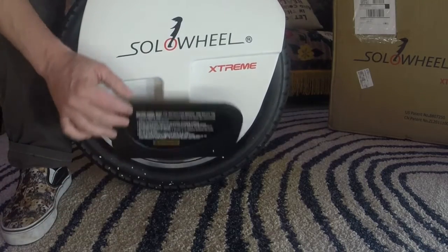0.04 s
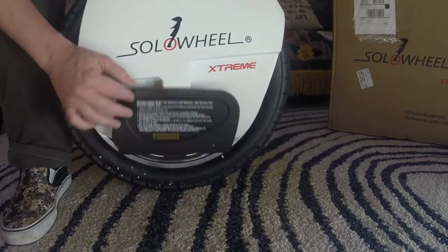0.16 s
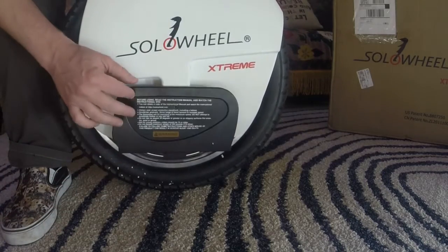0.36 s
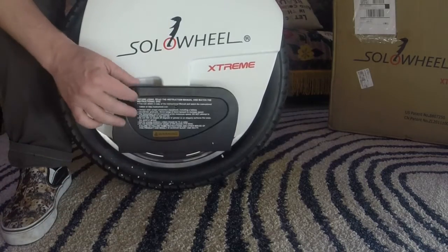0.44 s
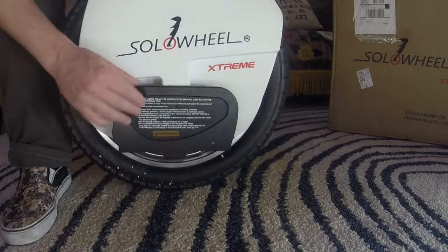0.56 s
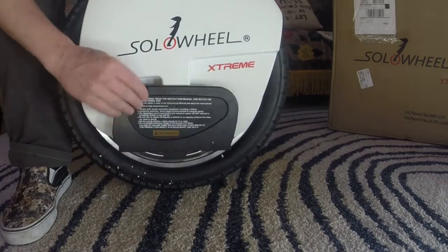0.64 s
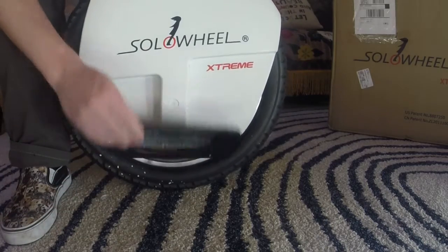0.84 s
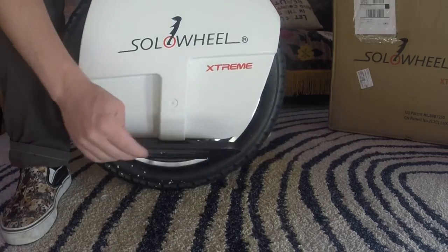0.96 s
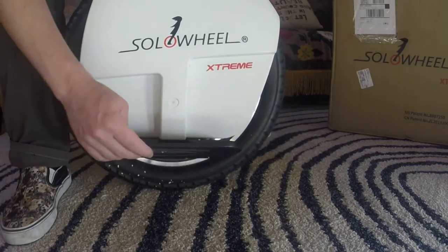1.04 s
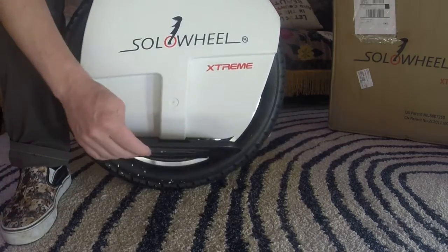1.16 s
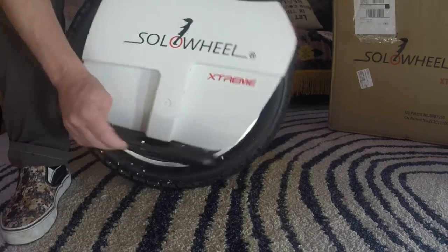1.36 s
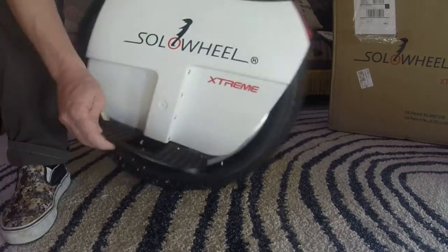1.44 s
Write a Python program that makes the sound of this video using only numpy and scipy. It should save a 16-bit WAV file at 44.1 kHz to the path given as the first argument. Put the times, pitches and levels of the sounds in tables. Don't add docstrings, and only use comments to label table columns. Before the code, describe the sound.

Close-up, a hinged pedal on a one-wheeled scooter gives one loud bright clack, then faint finger taps and a softer double clatter with low thud, in a carpeted room with slight flutter echo and low room tone.

```python
import sys
import numpy as np
from scipy import signal
from scipy.io import wavfile

SR = 44100
rng = np.random.default_rng(int(sys.argv[2]) if len(sys.argv) > 2 else 0)


def file_out(sig):
    cols = np.atleast_2d(sig).T
    lim = np.clip(cols, -1, 1)
    pcm = np.round(lim * 32767).astype(np.int16)
    wavfile.write(sys.argv[1], SR, pcm)


def boost_factor(decibels):
    exponent = np.asarray(decibels, float) / 20
    return 10 ** exponent


N = 66150


def rms_one(x):
    return x / np.sqrt(np.mean(x ** 2) + 1e-20)


def in_time(rows):
    return np.interp(np.arange(N) / SR, *np.transpose(rows))


def at_hz(points, hz):
    table_hz, value = np.transpose(points)
    return np.interp(np.log(hz), np.log(table_hz), value)


def filtered(x, order, hz, kind):
    return signal.sosfilt(signal.butter(order, hz, kind, fs=SR, output="sos"), x)


def drift(rate_hz):
    hop = 40
    pole = np.exp(-2 * np.pi * rate_hz * hop / SR)
    noise = rng.standard_normal(N // hop + 2002)
    slow = signal.lfilter([1], [1, -2 * pole, pole ** 2], noise)[2000:]
    return np.interp(np.arange(N) / hop, np.arange(len(slow)), rms_one(slow))


def noise_bands():
    edges = 20 * 2 ** (np.arange(30) / 3)
    white = rng.standard_normal((2, N + SR))
    bands = []
    for k, (low, high) in enumerate(zip(edges, edges[1:])):
        settled = filtered(white[k % 2], 2, [low, high], "band")[SR:]
        bands.append((np.sqrt(low * high), settled))
    return bands


def strike(times, db, modes, alternate=0):
    out = np.zeros(N)
    for k, (hz, level_db, t60) in enumerate(modes):
        clicks = np.full(N, 1e-18)
        sign = np.cos(np.pi * k * alternate)
        clicks[np.round(times * SR).astype(int)] = boost_factor(db[:, k] + level_db) * sign
        r = boost_factor(-60 / (t60 * SR))
        w = 2 * np.pi * hz / SR
        out += signal.lfilter([0, np.sin(w)], [1, -2 * r * np.cos(w), r * r], clicks)
    return out


def cracks(times, db, decay_s, dull_above_hz):
    clicks = np.full(N, 1e-18)
    clicks[np.round(times * SR).astype(int)] += boost_factor(db)
    envelope = signal.lfilter([1], [1, -np.exp(-1 / (decay_s * SR))], clicks)
    puff = envelope * rng.standard_normal(N)
    return signal.lfilter([1], [1, -np.exp(-2 * np.pi * dull_above_hz / SR)], puff)


def soft(x, contact_s):
    push = np.hanning(int(contact_s * SR) + 3)
    x = np.convolve(x, push / push.sum())[:N]
    return filtered(x, 2, 260, "high")


# pitch_hz [Hz], level_db [dB per Hz]
HUM_COLOUR = [(20, -4.5), (40, 0.5), (100, 0.5), (274, -6), (325, -8), (900, -14.5), (1540, -18.5),
              (9000, -36), (15400, -51)]
# start_s [s], level_db [dB]
HUM_SWELL_DB = [(0, -1.33), (1.1, 1.14), (1.3, -0.04), (1.5, 3.5)]
HUM_DB, HUM_PATCHY_DB = -54, 1.5


def hum():
    shared = drift(9)
    air = np.zeros(N)
    for hz, band in noise_bands():
        patchy_db = HUM_PATCHY_DB * (shared + drift(13))
        air += boost_factor(at_hz(HUM_COLOUR, hz) + patchy_db) * band
    return boost_factor(HUM_DB + in_time(HUM_SWELL_DB)) * rms_one(air)


# pitch_hz [Hz], t60_s [s]
TAIL_T60 = [(60, 0.67), (250, 0.39), (1000, 0.42), (2000, 0.38), (3200, 0.42), (6000, .28), (12000, .2)]
# pitch_hz [Hz], level_db [dB]
TAIL_COLOUR = [(60, -6.5), (250, -1.1), (600, -3), (1100, 1.3), (2000, 1.3), (3200, 0.4), (6000, -3.84),
               (12000, -5.5)]
TAIL_DB, TAIL_ONSET_S = -42, 0.0069


def room(x):
    t = np.arange(N) / SR
    tail = np.zeros(N)
    for hz, band in noise_bands():
        tail += boost_factor(at_hz(TAIL_COLOUR, hz) - 60 * t / at_hz(TAIL_T60, hz)) * band
    onset = 1 - np.exp(-(t / TAIL_ONSET_S) ** 2)
    return signal.fftconvolve(x, boost_factor(TAIL_DB) * tail * onset)[:N]


# delay_s [s], level_db [dB]
WALL_ECHOES = [(.0132, -24), (.0148, -15.5), (.0290, -32.5), (.0432, -25.5), (.0580, -33), (.0720, -32.5),
               (.0870, -37)]


def flutter(x):
    delay_s, db = np.transpose(WALL_ECHOES)
    echoes = np.zeros(N)
    echoes[(delay_s * SR).astype(int)] = boost_factor(db)
    return filtered(signal.fftconvolve(x, echoes)[:N], 1, [680, 1600], "band")


# start_s [s], level_db [dB]
FINGER_TAPS = [
    (.76, -60),
    (.822, -62),
    (.835, -58),
    (1.36, -85),
    (1.445, -53),
]
# pitch_hz [Hz], level_db [dB], t60_s [s]
FINGER_MODES = [(311.5, 2, 0.097), (1245, -2.5, 0.095), (706, -4.5, 0.051)]


def fingers():
    s, db = np.transpose(FINGER_TAPS)
    return filtered(strike(s, np.tile(db[:, None], len(FINGER_MODES)), FINGER_MODES), 2, 2500, "low")


# pitch_hz [Hz], level_db [dB], t60_s [s]
FRAME_MODES = [(98.4, -4.5, .5), (146.9, -1.5, 0.18), (167, -4, 0.28), (325, -5, .4)]


def frame(s, db, share_db):
    ring = strike(s, db[:, None] + np.array(share_db), FRAME_MODES, alternate=1)
    ring = filtered(ring, 2, [85, 500], "band")
    rise_s = 0.026
    return ring * np.clip((np.arange(N) / SR - s[0]) / rise_s, 0, 1) ** 2


# start_s [s], level_db [dB], low_modes_db [dB], tick_db [dB]
HINGE_KNOCKS = [(0.9585, -30, -8.5, -4), (0.9605, -27.5, -15, -8), (0.9627, -27.5, -11, -8),
                (.9638, -28.5, 5, 1), (0.9675, -25, -2.5, -5), (.9690, -24, -6.5, -7.5),
                (0.9719, -27, 0, -9), (.9800, -39, 15, 6), (0.9905, -19, -14.5, 2.5),
                (.9923, -20, -8, -1.5), (0.9938, -22.5, 3, -4.5), (.9960, -20, -2.5, -10),
                (0.9976, -22.5, -0.5, -17), (0.9993, -20.5, -5, -9.5), (1.0027, -26.5, -0.3, -11),
                (1.007, -36, 15.5, -12), (1.0083, -32, 4, 0.5), (1.079, -39.5, -0.7, -7)]
# pitch_hz [Hz], level_db [dB], t60_s [s]
PLATE_MODES = [(306, -1.5, 0.074), (443.2, 0.5, 0.076), (724, -6, 0.039), (883, 1.5, 0.013),
               (1215, 0, 0.023), (1380, 1.5, 0.0081), (1916, 1.5, 0.016), (2287, -2, 0.025),
               (2700, -3, 0.008), (3120, 0, 0.011), (3490, -7, 0.013), (4320, -10, 0.0091)]
KNOCK_TO_FRAME = [-4.5, -7.5, 1.5, -13.5]
TICK_DB, TICK_DECAY_S, TICK_DULL_HZ = -14.5, 0.0032, 1400


def unfold():
    s, db, low_db, tick_db = np.transpose(HINGE_KNOCKS)
    low = np.array(PLATE_MODES)[:, 0] < 600
    spread_db = 3 * rng.standard_normal((len(s), len(PLATE_MODES)))
    mode_db = db[:, None] - 7 + low_db[:, None] * low + spread_db
    ring = soft(strike(s, mode_db, PLATE_MODES, alternate=1), 0.00018)
    ticks = cracks(s, db + tick_db + TICK_DB, TICK_DECAY_S, TICK_DULL_HZ)
    ticks = soft(filtered(ticks, 2, 7800, "low"), 0.00008)
    return ring, ticks, frame(s, db + low_db - 8, KNOCK_TO_FRAME)


# start_s [s], level_db [dB]
SNAP_HITS = [
    (0.2411, -2),
    (0.2428, -6),
    (0.2434, -13),
    (0.2456, -12.5),
]
# pitch_hz [Hz], level_db [dB], t60_s [s]
SHELL_MODES = [(679, -16.5, 0.024), (1077, -6, 0.017), (1196, 5, .014), (1470, -14, .012),
               (1860, -15, 0.019)]
# pitch_hz [Hz], level_db [dB], t60_s [s]
SIDE_MODES = [(268, -6.5, 0.01503), (450, -2, .012), (638.7, -2.5, 0.011), (806, -2.5, 0.017),
              (1010, -4, 0.022), (1123.5, -3, 0.024), (1186.4, -6, 0.026), (1374, -14, .012),
              (1874, -17.5, .006), (2370, -24, 0.0067), (2930, -9.5, 0.02), (3260, -26, 0.01)]
# pitch_hz [Hz], level_db [dB], t60_s [s]
RIM_MODES = [(2408, -35.5, .012), (2935, -29.5, .012), (3220, -21.5, 0.031), (4000, -38, 0.035),
             (5467, -38, 0.03), (7400, -52.5, .012), (9100, -48.5, .01), (11120, -55.5, .012)]
SNAP_TO_FRAME = [-20, 3.5, -8, 0.5]
CRACK_DB, CRACK_DECAY_S, CRACK_DULL_HZ = -31.5, 0.0038, 2494
AIR_PUSH_S, AIR_PUSH_DB = 0.003, -27


def snap():
    s, db = np.transpose(SNAP_HITS)
    body = soft(-strike(s, np.tile(db[:, None], len(SHELL_MODES)), SHELL_MODES), 0.00051)
    body = filtered(body, 2, 700, "high")
    sides = strike(s[:1], np.tile(db[:1, None], len(SIDE_MODES)), SIDE_MODES, alternate=0.99)
    rim_db = db[:, None] + 2.5 * rng.standard_normal((len(s), len(RIM_MODES)))
    rim = soft(strike(s, rim_db, RIM_MODES, alternate=1), 0.00003)
    crack = soft(cracks(s, db + CRACK_DB, CRACK_DECAY_S, CRACK_DULL_HZ), 0.00003)
    phase = np.clip((np.arange(N) / SR - s[0]) / AIR_PUSH_S, 0, 1)
    push = boost_factor(AIR_PUSH_DB) * np.sin(np.pi * phase) ** 2
    boom = frame(s[:1], db[:1] - 31.5, SNAP_TO_FRAME)
    return body + push + rim, soft(sides, 0.00027), crack, boom


# start_s [s], level_db [dB]
RECORDER_GAIN = [(0, 2), (.219, 1.5), (.226, -9), (.3, -3), (.55, -10), (.75, -7.5), (.95, -3.5),
                 (1.15, -0.5), (1.5, 2)]


def recorder_gain():
    return boost_factor(in_time(RECORDER_GAIN))


def scene():
    clack, sides, crack, boom = snap()
    knocks, ticks, thump = unfold()
    direct = clack + crack + knocks + ticks + fingers()
    to_room = sides + boost_factor(10.5) * crack + boost_factor(-0.4) * (knocks + boost_factor(8) * ticks)
    hits = direct + flutter(direct) + room(to_room) + boom + thump
    return (hits / recorder_gain() + hum())[None]


def band_limit(x):
    return signal.sosfilt(signal.butter(12, 15590, fs=SR, output="sos"), x)


def record(dry):
    clip_top = 2.6
    x = clip_top * np.tanh(dry * recorder_gain() / clip_top)
    x = signal.sosfilt(signal.cheby2(12, 70, 15500, fs=SR, output="sos"), x)
    return band_limit(x)


dry = scene()
out = record(dry)
file_out(out)
```